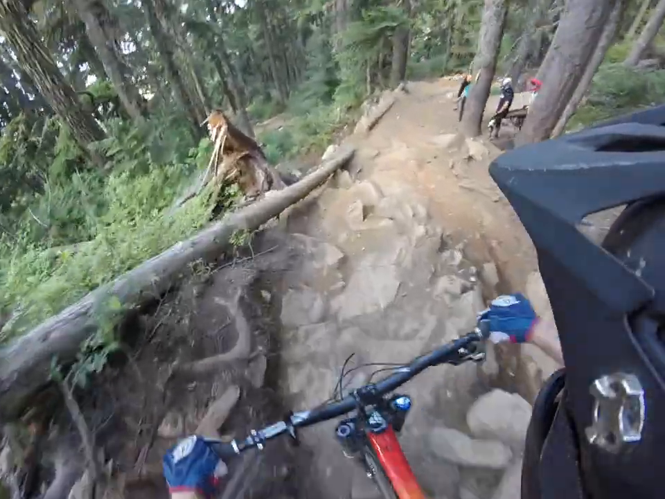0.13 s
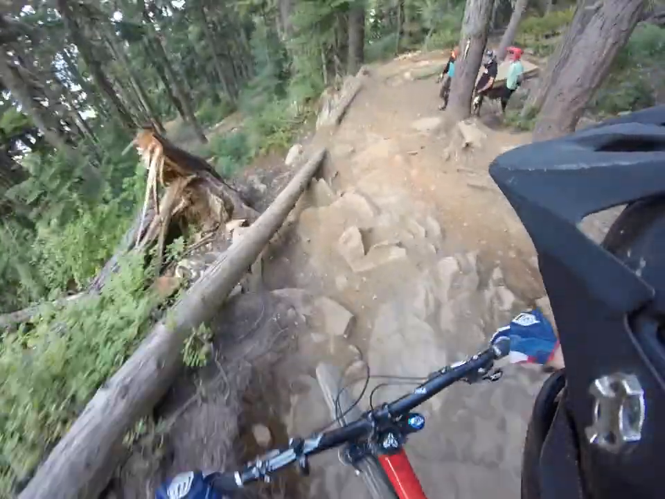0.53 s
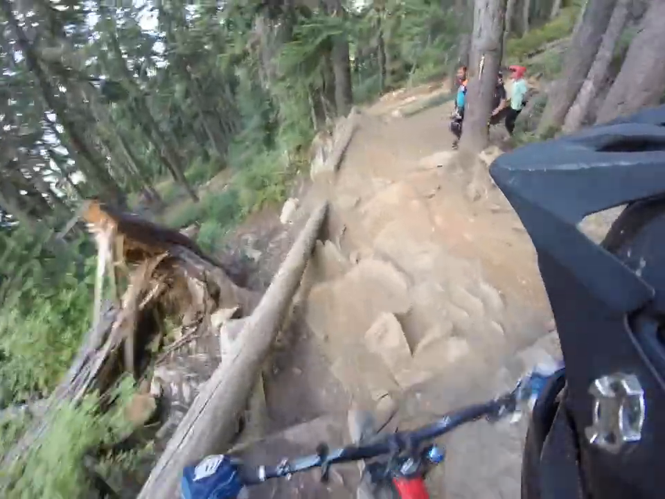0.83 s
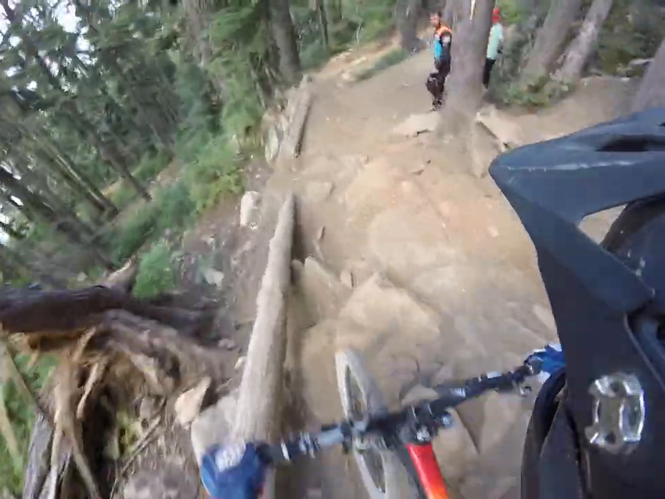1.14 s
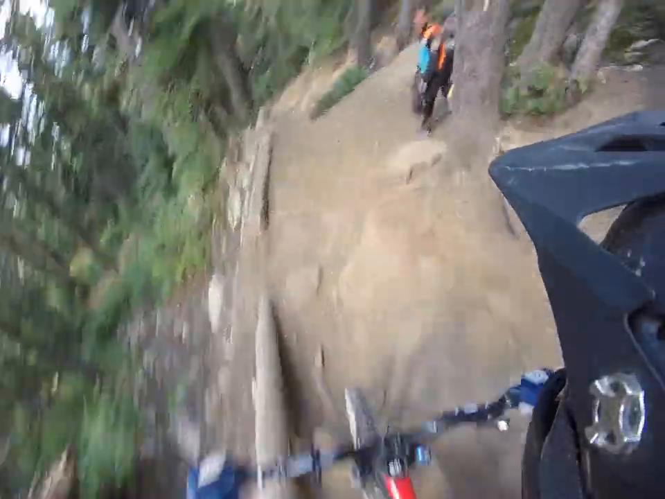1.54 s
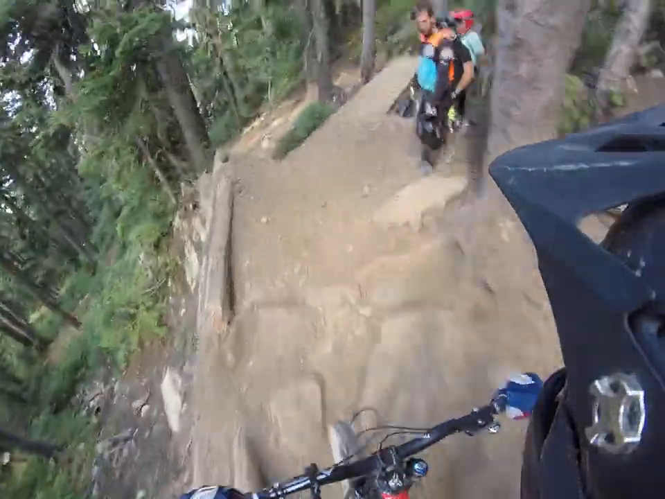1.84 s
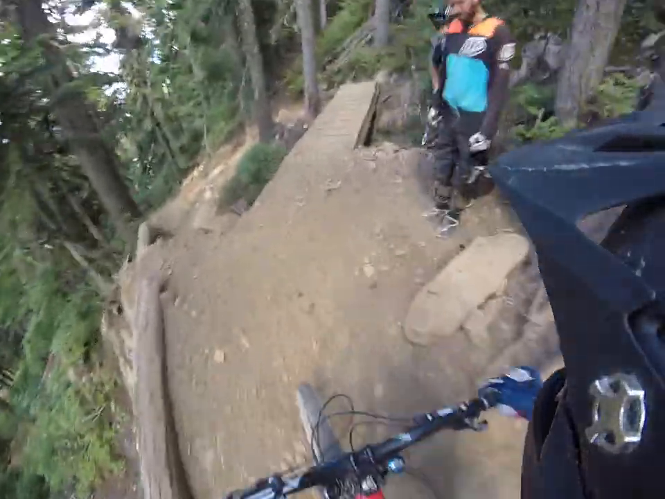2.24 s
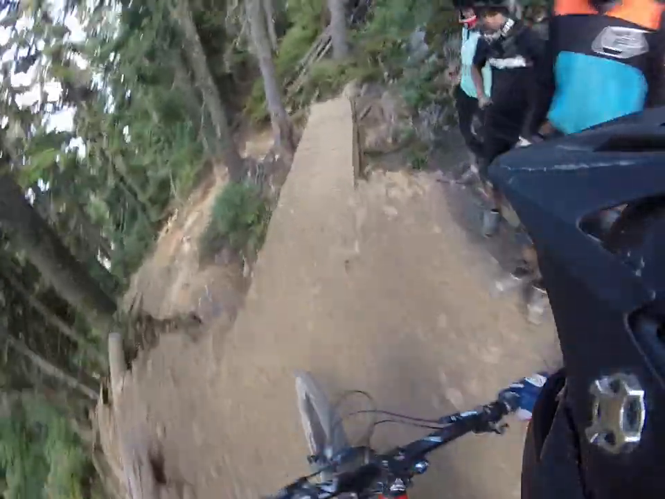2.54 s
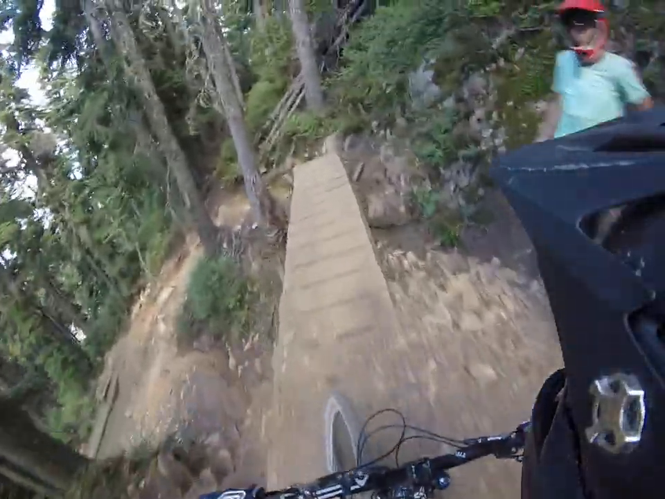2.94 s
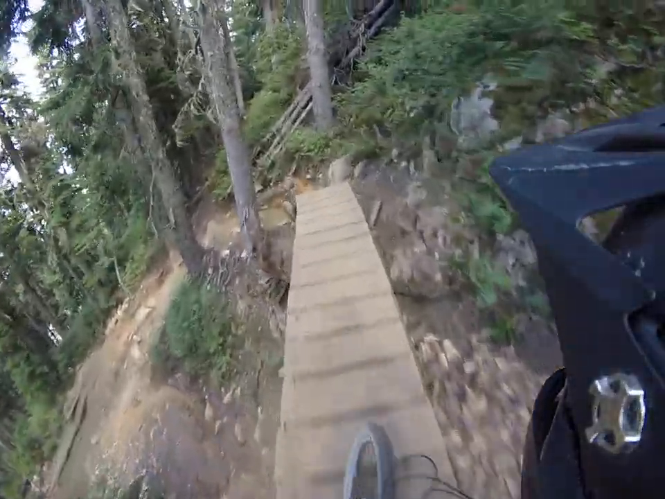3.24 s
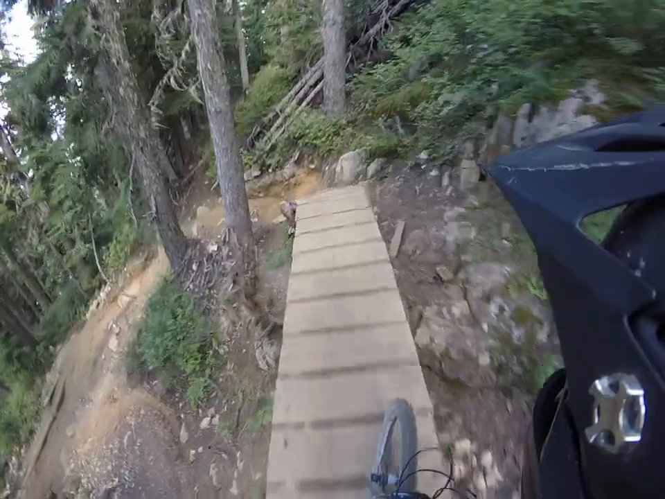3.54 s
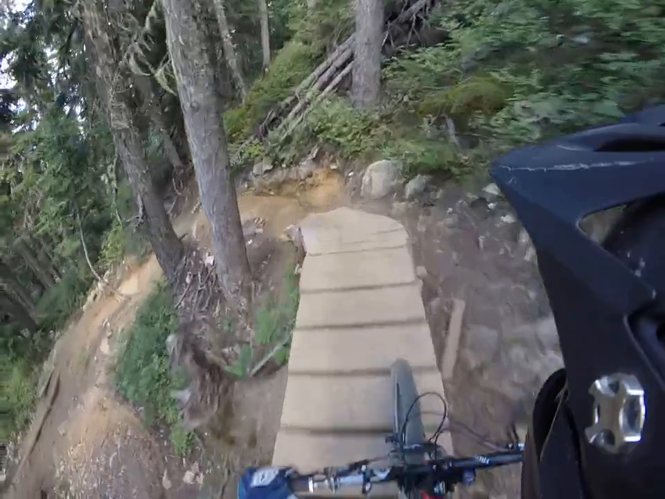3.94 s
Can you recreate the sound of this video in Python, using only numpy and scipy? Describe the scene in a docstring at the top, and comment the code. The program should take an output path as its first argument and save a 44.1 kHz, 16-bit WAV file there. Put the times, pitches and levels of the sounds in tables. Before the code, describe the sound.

Low wind thumps buffet a rider's microphone while metallic clicks, loose rattles and tiny high brake squeaks follow a bike over rocks, then thin out.

```python
"""A forest trail: a mountain bike rolls over rocks and slows onto a plank bridge, heard at the rider's helmet.
Wind buffets the microphone with deep, slow swings and coloured noise for rumble.
Chain, cables and frame clatter at each rock: noise bursts ring through resonances, and loose parts tick between.
The brake discs squeak very high as gliding tones with fuzzy trails; tyres and air hiss underneath as noise."""
import sys
import numpy as np
from scipy import signal
from scipy.fft import rfft, irfft, next_fast_len
from scipy.io import wavfile
from scipy.ndimage import map_coordinates

SR = 44100
rng = np.random.default_rng(int(sys.argv[2]) if len(sys.argv) > 2 else 0)


def convert_level_to_amplitude(level_db):
    """Map a level in decibels to its linear amplitude factor."""
    exponent = np.asarray(level_db, float) / 20
    return 10 ** exponent


def store_wav(level_fs):
    """Save 16-bit WAV to argv[1]."""
    pcm = np.round(np.clip(np.atleast_2d(level_fs), -1, 1) * 32767)
    wavfile.write(sys.argv[1], SR, pcm.T.astype(np.int16))


N = 180898  # samples, about 4.1 s

# strongest buffets of wind on the microphone:
# (time [s], peak level [dB], pitch [Hz], length at half height [s])
BUFFETS = [(0.166, -24, 39.7, 0.025), (0.292, -13, 39, 0.023), (0.343, -24, 38.8, 0.076),
           (0.594, -21, 38.1, 0.13), (0.762, -21, 42.8, 0.085), (0.812, -8.5, 45.4, 0.058),
           (0.961, -21, 37.7, 0.13), (1.141, -20, 39.8, 0.071), (1.221, -8.5, 46.4, 0.081),
           (1.306, -21.5, 47.2, 0.078), (1.409, -24.5, 37, 0.096), (1.553, -26, 40, 0.029),
           (1.687, -24, 47.6, 0.09), (1.85, -11, 42.5, 0.034), (1.901, -15, 41.17, 0.16),
           (1.989, -12.5, 44, 0.037), (2.114, -19.5, 35.8, 0.07), (2.166, -16, 44, 0.036),
           (2.211, -21, 42.7, 0.046), (2.271, -22.5, 37, 0.055), (2.432, -28.5, 45.6, 0.087),
           (2.581, -26.5, 38.1, 0.09), (2.736, -27.5, 39, 0.093)]
# weak throbbing between the buffets, fading as the bike slows: (time [s], level [dB])
AIRSPEED = [(0, -34), (1.5, -32.5), (2.6, -37), (3.0, -42.5), (3.3, -46.5), (3.45, -40.5), (4.1, -42.5)]
# colour of the weak throbbing: (frequency [Hz], relative density [dB per Hz])
THROB_COLOUR = [(20, -22), (33, -12.5), (43, -3.5), (52, -9), (65, -32), (120, -92)]
# colour of the slowest heave of the air: (frequency [Hz], relative density [dB per Hz])
HEAVE_COLOUR = [(10, -25), (20, 12.5), (30, 7.5), (55, -15), (70, -16), (120, -87)]
# wind rumble coming in gusts: (time [s], level [dB])
GUSTS = [(0.0, -55), (0.16, -44), (0.18, -61), (0.27, -37), (0.47, -58), (0.56, -46), (0.65, -60.5),
         (0.76, -34.5), (1.12, -53.5), (1.18, -40), (1.36, -58.5), (1.68, -42), (1.7, -47.5), (1.95, -42.5),
         (2.1, -49), (2.21, -37.5), (2.27, -49.5), (2.71, -53), (2.74, -47.5), (3.0, -60), (3.35, -52),
         (3.8, -56), (3.89, -57), (4.1, -60.5)]
# colour of the rumble above the throb: (frequency [Hz], relative density [dB per Hz])
RUMBLE_COLOUR = [(45, -10.5), (62, -3), (78, -9), (98, -7), (118, -3), (135, -15.5), (200, -26.5),
                 (350, -66), (700, -83)]
# blows on chain and frame:
# (time [s], tubes level [dB], stays level [dB], chain level [dB], tiniest parts level [dB])
BLOWS = [(0.04,-68,-48,-51,-76),(0.0497,-49,-38,-43,-62),(0.1778,-54,-55.5,-57,-79),(0.2397,-45.5,-48.5,-51,-71),(0.248,-57,-55,-46.5,-61),(0.3675,-57,-66,-57,-67),(0.463,-55,-53,-63,-87),(0.4793,-53,-60,-59,-81),(.506,-59,-54,-52.5,-69),(0.532,-64,-65,-58,-68),(0.5642,-46,-48,-69,-80),(0.574,-49.5,-56,-74,-80),(0.669,-48.5,-60,-56,-77),(.683,-62,-46,-50,-66),(0.691,-50,-54,-67,-81),(.706,-64,-58,-55,-69),(0.719,-62,-49.5,-48.5,-69),(.746,-60,-50,-47.5,-50),(.829,-69,-53,-54,-77),(0.8603,-50.5,-52,-48,-53.5),(0.8986,-57,-51,-57,-75),(.9906,-50.5,-58,-69,-83),(1.005,-74,-65,-52.5,-73),(1.08,-71,-54,-56,-80),(1.1126,-53,-44,-47,-56),(1.155,-59,-45,-64,-79),(1.178,-52,-48.5,-50,-68),(1.2306,-68,-55,-48,-67),(1.272,-71,-64,-58,-76),(1.3073,-54,-49.5,-62,-77),(1.318,-47.5,-53,-62,-84),(1.33,-50,-61,-63,-83),(1.3685,-56,-53,-67,-79),(1.4822,-48,-44.5,-50.5,-80),(1.557,-44.5,-44.5,-50,-80),(1.582,-51,-50,-55,-78),(1.5955,-55,-57,-56,-79),(1.613,-52,-58,-66,-78),(1.639,-52,-41.5,-45.5,-77),(1.7581,-50,-39.5,-46.5,-57),(1.7962,-52,-53,-63,-79),(1.8146,-63,-47.5,-51,-69),(1.836,-51,-52,-51,-64),(1.863,-54,-61,-54,-77),(1.878,-57,-51,-50,-61),(1.93,-47,-66,-76,-79),(1.964,-45.5,-45,-54,-62),(2.0268,-67,-55,-47.5,-69),(2.038,-57,-58,-54,-64),(2.0719,-58,-49,-45,-63),(2.0904,-48,-47,-51,-54),(2.096,-55.5,-56,-58,-61),(2.1152,-64,-54,-43,-63),(2.124,-53,-49,-49,-69),(2.1397,-57,-41.5,-44.5,-46),(2.154,-55,-48.5,-67,-70),(2.169,-55.5,-57,-47.5,-62),(2.187,-58,-52,-50,-65),(2.205,-65,-49.5,-50.5,-77),(2.2163,-67,-50,-48,-59),(2.2418,-79,-56,-47.5,-62),(2.308,-67,-56,-57,-80),(2.3249,-54,-40,-42.5,-53),(2.3428,-51,-52,-55,-69),(2.359,-54,-54,-55,-71),(2.403,-73,-69,-60,-70),(2.442,-68,-55,-59.5,-74),(2.49,-63,-53,-57,-81),(2.5,-57,-52,-51.5,-64),(2.5383,-65,-53,-54,-73),(2.552,-67,-66,-50,-60),(2.6073,-68,-65,-60,-67),(2.6232,-61,-53,-72,-77),(2.645,-56,-58.5,-47,-62),(2.6517,-64,-42.5,-50,-65),(2.7586,-53.5,-57.5,-78,-78),(2.93,-72,-60,-63,-80),(3.018,-68,-62,-57,-84),(3.056,-66,-52,-52,-67),(3.086,-72,-51.5,-56,-60),(3.152,-79,-60,-52,-71),(3.2444,-64,-65,-44.5,-61),(3.2554,-56.5,-40.5,-48,-52),(3.2706,-70,-81,-66,-57),(3.525,-55,-53.5,-60,-75),(3.554,-52,-56,-74,-78),(3.6974,-79,-61,-62.5,-80),(3.7867,-78,-63,-59.5,-66),(3.938,-60,-52,-53.5,-63)]
# tyres thudding on rocks: (time [s], peak level [dB])
THUDS = [(0.236, -58), (0.477, -49.5), (0.575, -46), (0.681, -59), (0.688, -52.5), (0.9, -54), (1.11, -59),
         (1.155, -49.5), (1.309, -49.5), (1.332, -48.5), (1.636, -56), (1.963, -54), (2.082, -49),
         (2.34, -54), (3.539, -59)]
# resonances, one list each for tyres, frame tubes, stays, chain and the tiniest parts:
# (frequency [Hz], width [Hz], relative level [dB])
PART_MODES = [
    [(590, 470, -1.5), (813, 115, 5), (1004, 207, -0.5)],
    [(1240, 380, -3), (1643, 190, 5.5), (1940, 134, 1.5)],
    [(2133, 160, -1), (2453, 124.5, 3), (3172, 265, -4.5), (4142, 203, -7.5)],
    [(4646, 365, 5.5), (5576, 250, 8), (6756, 600, 5.5), (8270, 920, -3.5)],
    [(8970, 2500, 13.5), (12300, 1370, -26), (13400, 1620, 3.5)],
]
# loose parts shaken by the ground, before each part takes its share:
# (time [s], grit of the frame [dB], jingle of the chain [dB])
ROUGHNESS = [(0.0, -42, -65), (0.06, -53.5, -57.5), (0.32, -59, -72), (0.49, -56, -63.5),
             (0.65, -56, -65.5), (1.02, -56.5, -62.5), (1.15, -50.5, -58), (1.3, -59.5, -66.5),
             (1.58, -59.5, -65), (1.72, -56, -60), (1.87, -53, -60), (2.01, -55, -61.5), (2.12, -50, -51),
             (2.2, -60.5, -71), (2.29, -60, -63), (2.57, -57, -68), (2.67, -56, -64.5),
             (2.84, -61.5, -71.5), (3.21, -66.5, -68), (3.55, -70, -73.5), (4.1, -64, -71.5)]
# brake squeaks: (time [s], peak level [dB], base pitch [Hz], fading t60 [s])
SQUEAKS = [(0.05, -61, 13170, 0.22), (0.3, -56, 12900, 0.39), (0.375, -58.5, 13250, 0.3),
           (0.436, -56, 13000, 0.3), (0.53, -66, 12900, 0.24), (0.578, -71, 13220, 0.3),
           (1.009, -51, 14800, 0.19), (1.319, -40, 14850, 0.1), (1.57, -71, 13000, 0.3),
           (1.699, -63, 13000, 0.27), (1.764, -54, 13000, 0.28), (1.839, -61, 13000, 0.3),
           (1.9, -65, 12950, 0.32), (2.11, -61, 12800, 0.46), (2.255, -57.5, 12900, 0.5),
           (2.33, -63, 12680, 0.33), (2.399, -56, 12900, 0.27), (2.46, -65, 12700, 0.41),
           (2.767, -53, 12930, 0.42), (2.859, -46.5, 12820, 0.23), (3.09, -67, 12850, 0.33),
           (3.171, -46, 13040, 0.2), (3.556, -51.5, 12500, 0.3), (3.79, -48, 12800, 0.27),
           (3.925, -68, 12400, 0.3), (4.08, -54, 12530, 0.34)]
# colour of the steady hiss of tyres and air: (frequency [Hz], relative density [dB per Hz])
HISS_COLOUR = [(88, -40), (150, -3.5), (296, -9), (947, -16.5), (1420, -19.5), (2270, -20.5), (2700, -23),
               (5530, -30.5), (12700, -41.5), (15400, -56)]


def unit(x):
    """x scaled to rms 1."""
    return x / np.sqrt(np.mean(x ** 2) + 1e-20)


def curves(rows):
    """One value per sample for each column after the time."""
    times, *columns = np.transpose(rows)
    return [np.interp(np.arange(N) / SR, times, column) for column in columns]


def wobble(rate):
    """A smooth random curve, rate knots a second."""
    knots = rng.standard_normal(int(N * rate / SR) + 4)
    return map_coordinates(knots, [np.arange(N) * rate / SR])


def filtered(x, response):
    """x times a response of frequency, possibly complex."""
    size = next_fast_len(N + SR // 2)
    spectrum = rfft(x, size) * response(np.fft.rfftfreq(size, 1 / SR))
    return irfft(spectrum, size)[..., :N]


def coloured(points):
    """Noise of rms 1 whose spectrum follows the points along log frequency."""
    f, db = np.transpose(points)

    def colour(hz):
        return convert_level_to_amplitude(np.interp(np.log(hz + 1), np.log(f + 1), db))

    return unit(filtered(rng.standard_normal(N), colour))


def ring(x, modes):
    """x through causal resonances of alternating sign, scaled so that white noise keeps its rms."""
    def body(f):
        total = 0
        for k, (centre, width, db) in enumerate(modes):
            damping = 1j * f * width
            total = total + (-1) ** k * convert_level_to_amplitude(db) * damping / (centre ** 2 - f ** 2 + damping)
        return total

    impulse = np.eye(1, N)[0]
    return filtered(x, body) / np.linalg.norm(filtered(impulse, body))


def wind():
    """Each buffet swings the microphone for a few slow cycles and heaves the air; rougher rumble rides on it."""
    t = np.arange(N) / SR
    throb, push = np.zeros(N), np.zeros(N)
    for (start, db, hz, length), phase in zip(BUFFETS, rng.random(len(BUFFETS))):
        swell = convert_level_to_amplitude(db) * np.exp(-np.log(2) * (2 * (t - start) / length) ** 2)
        throb += swell * np.cos(2 * np.pi * (hz * (t - start) + phase))
        push += swell
    heave = convert_level_to_amplitude(-12) * push * coloured(HEAVE_COLOUR)
    airspeed_db, = curves(AIRSPEED)
    between = convert_level_to_amplitude(airspeed_db) * (coloured(THROB_COLOUR) + convert_level_to_amplitude(-5.5) * coloured(HEAVE_COLOUR))
    gust_db, = curves(GUSTS)
    rumble = convert_level_to_amplitude(gust_db + 1.4 * wobble(8.5)) * coloured(RUMBLE_COLOUR)
    return throb + heave + between + rumble


def blows(times, db, attack, t60):
    """Envelope of short scrapes: a quick swell and drop, then a faint chatter."""
    train, t = np.zeros(N), np.arange(SR // 8) / SR
    np.add.at(train, np.clip((times * SR).astype(int), 0, N - 1), convert_level_to_amplitude(db))
    scrape = t / attack * np.exp(1 - t / attack)
    chatter = convert_level_to_amplitude(-12.5 - 60 * t / t60) * (1 - np.exp(-t / attack))
    return signal.fftconvolve(train, scrape + chatter)[:N]


def clatter():
    """Blows shake groups of parts, which slap back once, weaker; the tiniest answer and die soonest."""
    # tyres, tubes, stays, chain, tiniest parts
    attack_s = (0.0039, 0.002, 0.0024, 0.0024, 0.0018)
    chatter_t60_s = (0.06, 0.17, 0.16, 0.083, 0.035)
    times, *strengths = np.transpose(BLOWS)
    luck = rng.random((len(times), 2))
    rebound_times = times + 0.0114 * (0.4 + 1.5 * luck[:, 0])
    rebound_db = -12 - 6 * luck[:, 1]
    struck = [np.transpose(THUDS)]  # tyres thud without a rebound
    for db in strengths:
        struck.append((np.r_[times, rebound_times], np.r_[db, db + rebound_db]))
    total = np.zeros(N)
    for (when, db), attack, t60, modes in zip(struck, attack_s, chatter_t60_s, PART_MODES):
        envelope = blows(when - 0.0008, db, attack, t60)  # the swell starts just ahead
        total += ring(rng.standard_normal(N) * envelope, modes)
    return total


def shaking(level_db, count):
    """Noise shaped by dense random ticks on a gritty bed."""
    grain = rng.random((count, 2))
    tick_times, tick_db = grain[:, 0] * N / SR, 16 * grain[:, 1]
    ticks = unit(blows(tick_times, tick_db, attack=0.0005, t60=0.074))
    uneven_db = 1.5 * wobble(25)
    return convert_level_to_amplitude(level_db + uneven_db) * (ticks + 0.5) * rng.standard_normal(N)


def rattle():
    """Loose parts keep ticking between blows, more on rough ground, and ring the same resonances."""
    grit, jingle = (shaking(db, count=700) for db in curves(ROUGHNESS))
    tyres, tubes, stays, chain, tiny = PART_MODES
    frame = convert_level_to_amplitude(-18.5) * ring(grit, tyres) + convert_level_to_amplitude(-11) * ring(grit, tubes) + convert_level_to_amplitude(-8.5) * ring(grit, stays)
    return frame + convert_level_to_amplitude(-5.5) * ring(jingle, chain) + convert_level_to_amplitude(-18) * ring(jingle, tiny)


def brakes():
    """A pad grips the disc: a short sliding whistle, then a fuzzy trail that climbs and fades."""
    out, t = np.zeros(N + SR), np.arange(SR // 4) / SR
    for start, db, hz, t60 in SQUEAKS:
        pitch = hz + 120 * np.exp(-t / 0.0089) + 1500 * t  # dips at first, then climbs
        smoother = np.hanning(SR // 260)[None]
        fuzz = signal.fftconvolve(rng.standard_normal((2, len(t))), smoother, "same", axes=1)
        fuzz = unit(fuzz[0]) + 1j * unit(fuzz[1])
        whistle = np.exp(-((t - 0.017) / 0.0094) ** 2)
        trail = convert_level_to_amplitude(-6 - 60 * t / t60) * (1 - np.exp(-(t / 0.002) ** 2)) * fuzz
        carrier = np.exp(2j * np.pi * np.cumsum(pitch) / SR)
        out[round(start * SR):][:len(t)] += convert_level_to_amplitude(db) * np.real((whistle + trail) * carrier)
    return out[:N]


def hiss():
    """Noise of tyres and air, slightly uneven, swelling a little with the gusts."""
    mean_db, gust_share = -57.5, 0.19  # share of the gusts' swing in dB
    gust_db, = curves(GUSTS)
    swell_db = gust_share * (gust_db - gust_db.mean())
    return convert_level_to_amplitude(mean_db + swell_db + 1.3 * wobble(6.0)) * coloured(HISS_COLOUR)


def scene():
    """All layers summed into one channel."""
    return (wind() + clatter() + rattle() + brakes() + hiss())[None]


def band_limit(x):
    """A steep low-pass at the top of the band."""
    return signal.sosfilt(signal.butter(12, 15600, fs=SR, output="sos"), x)


def record(dry):
    """The microphone's response falls steeply at the very top, halving at 14.6 kHz."""
    heard = filtered(dry, lambda hz: 1 / (1 + (hz / 14600) ** 30))
    return band_limit(heard)


dry = scene()
out = record(dry)
store_wav(out)
```